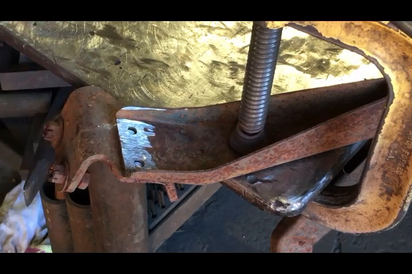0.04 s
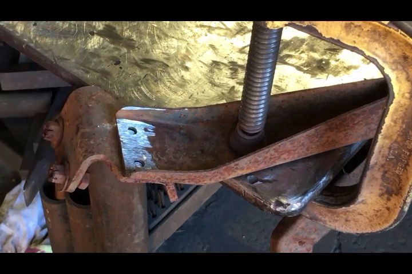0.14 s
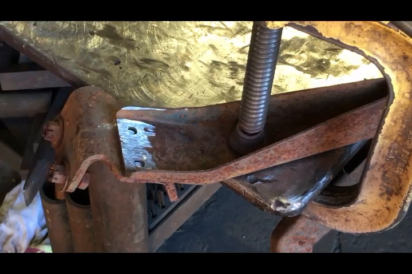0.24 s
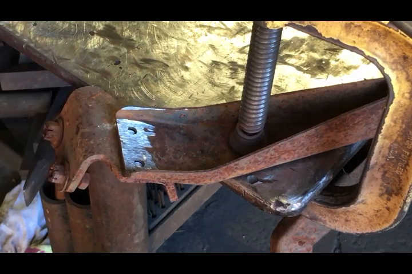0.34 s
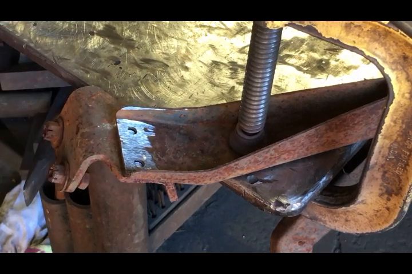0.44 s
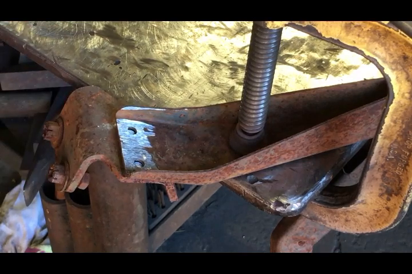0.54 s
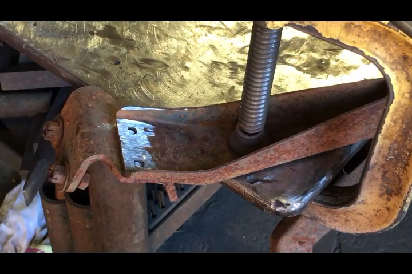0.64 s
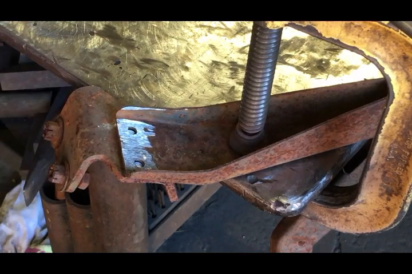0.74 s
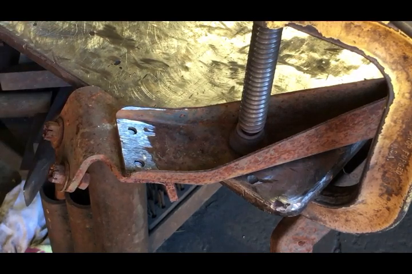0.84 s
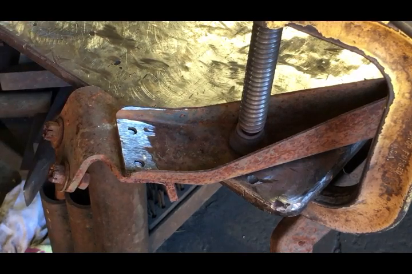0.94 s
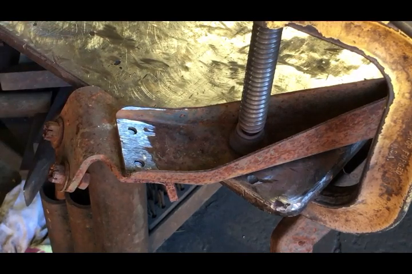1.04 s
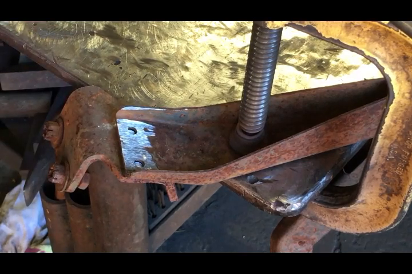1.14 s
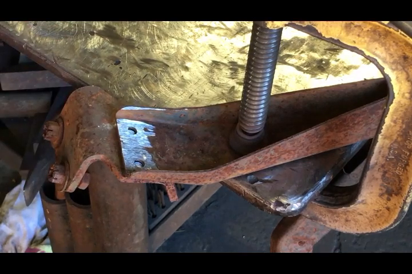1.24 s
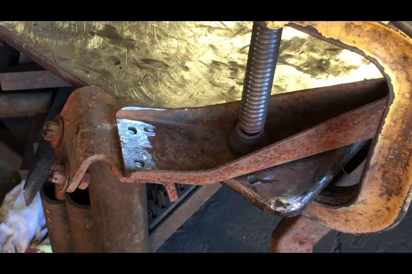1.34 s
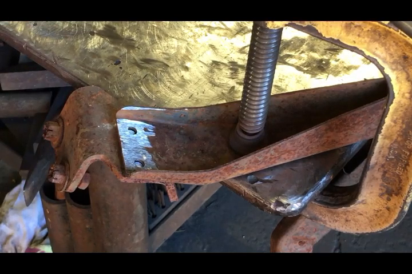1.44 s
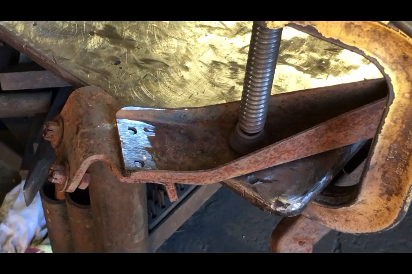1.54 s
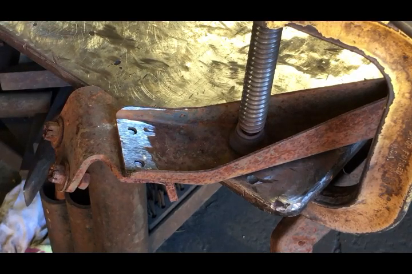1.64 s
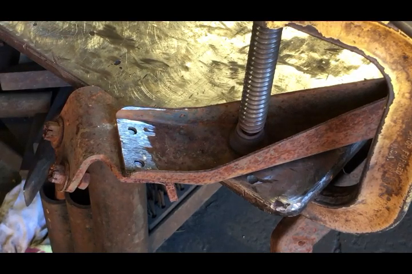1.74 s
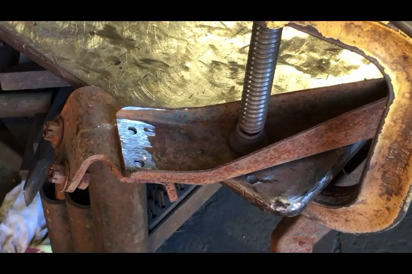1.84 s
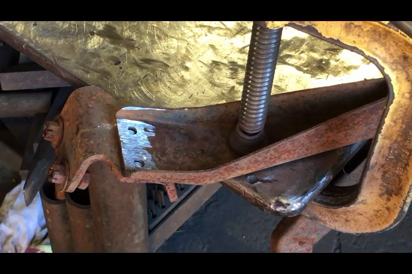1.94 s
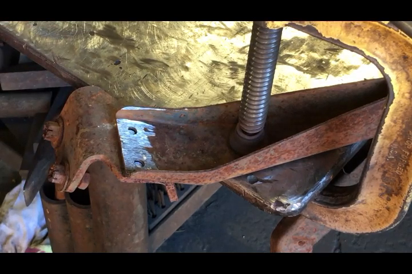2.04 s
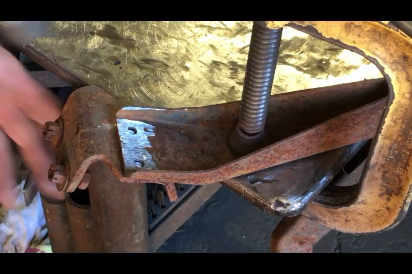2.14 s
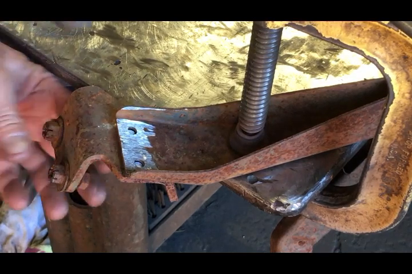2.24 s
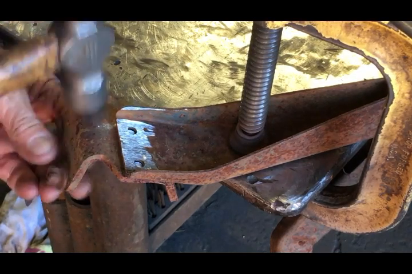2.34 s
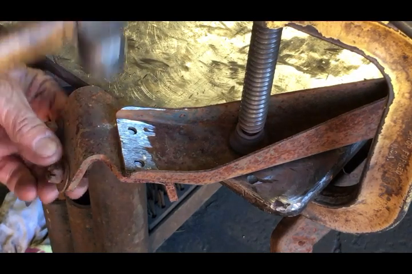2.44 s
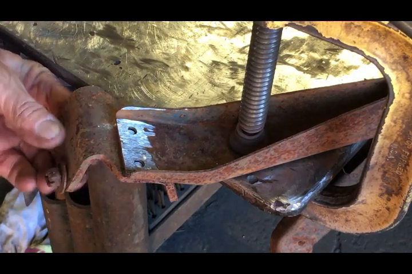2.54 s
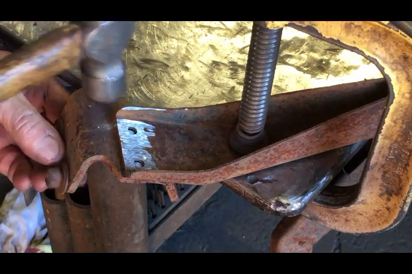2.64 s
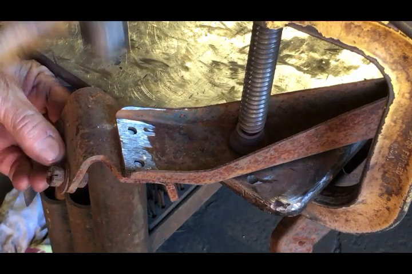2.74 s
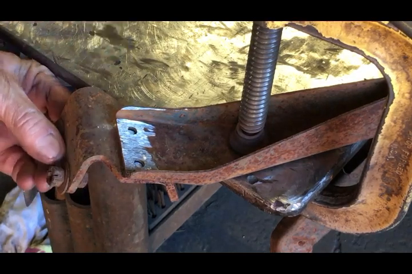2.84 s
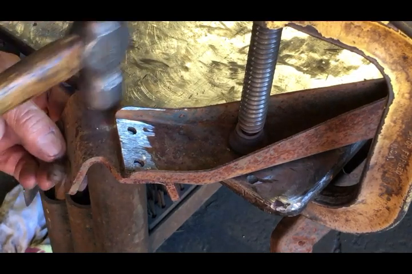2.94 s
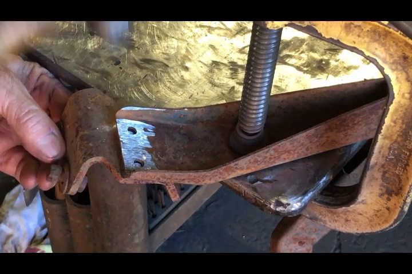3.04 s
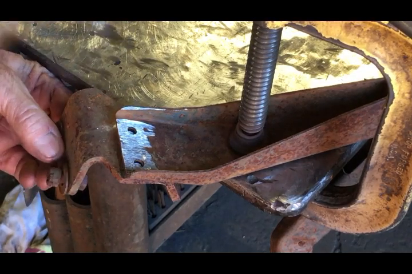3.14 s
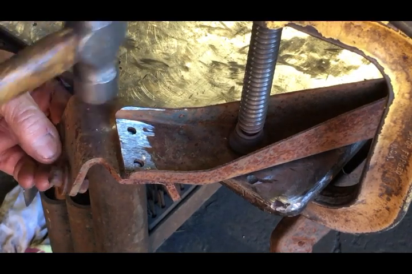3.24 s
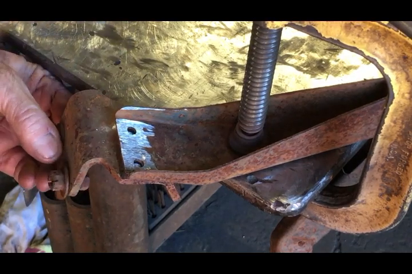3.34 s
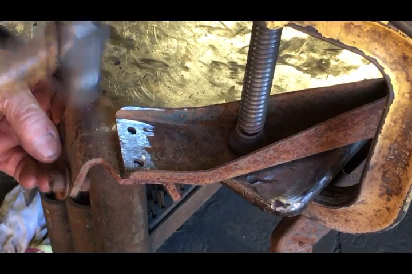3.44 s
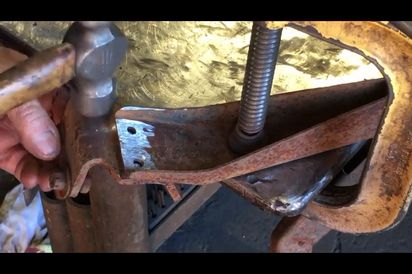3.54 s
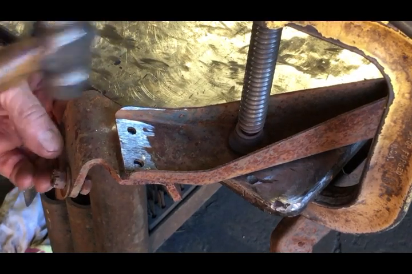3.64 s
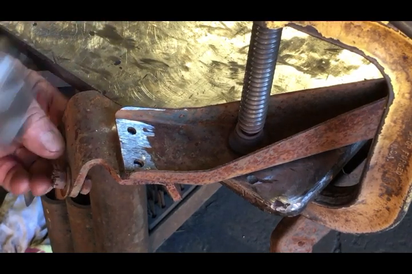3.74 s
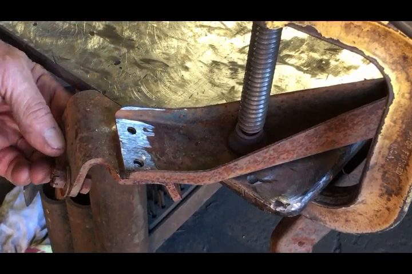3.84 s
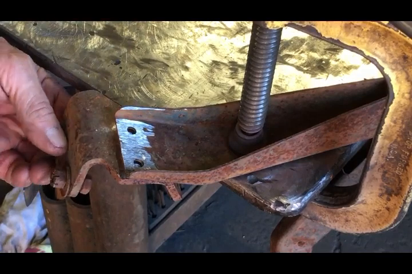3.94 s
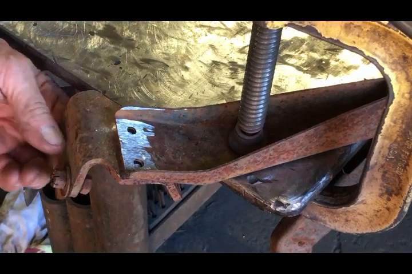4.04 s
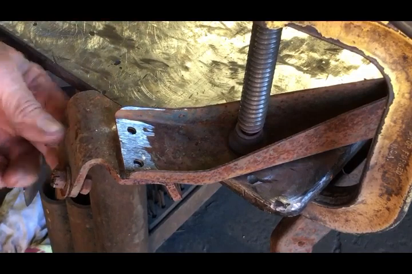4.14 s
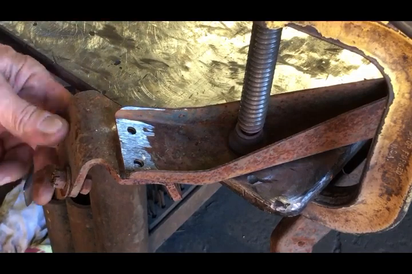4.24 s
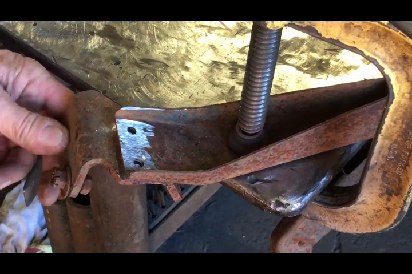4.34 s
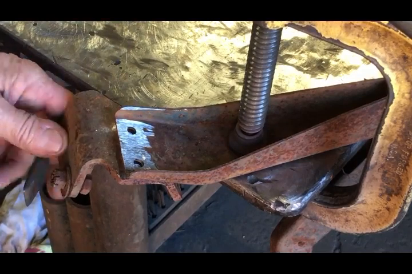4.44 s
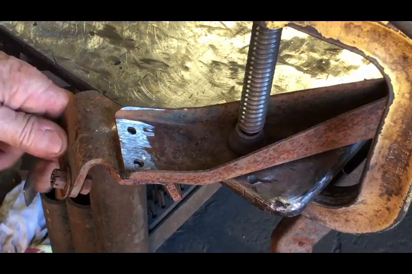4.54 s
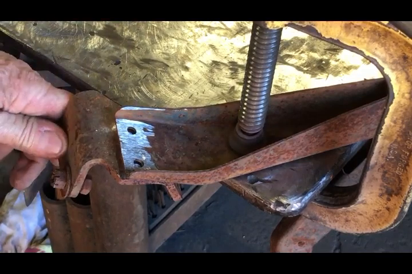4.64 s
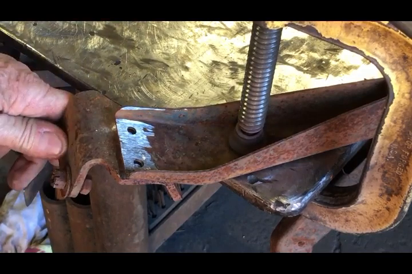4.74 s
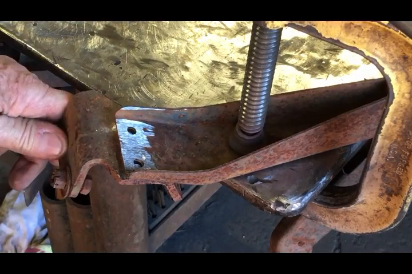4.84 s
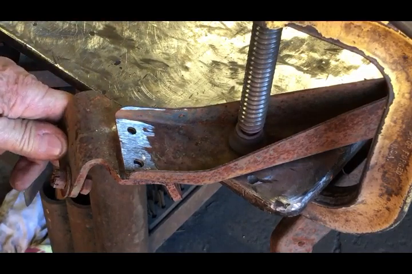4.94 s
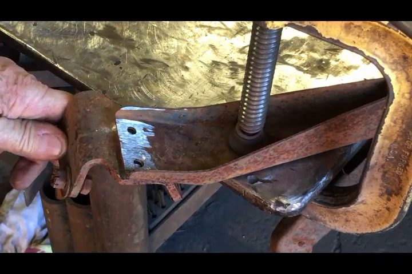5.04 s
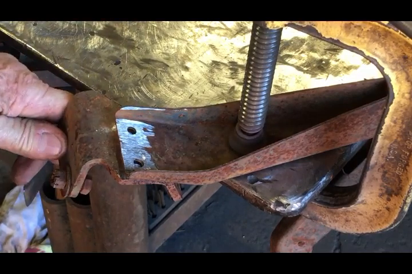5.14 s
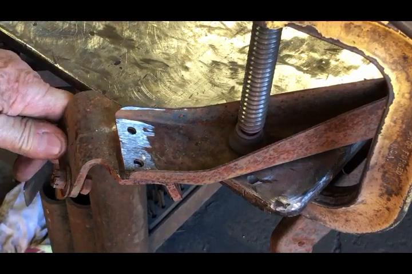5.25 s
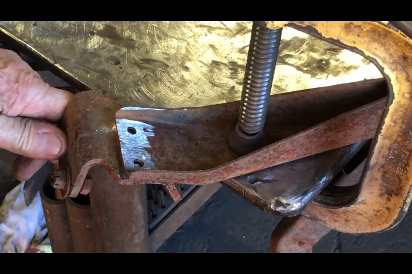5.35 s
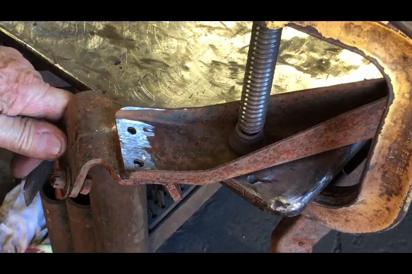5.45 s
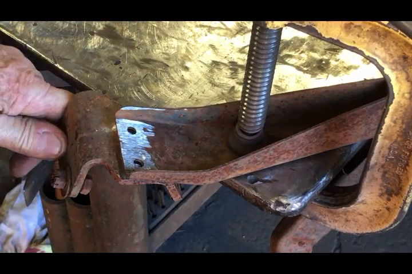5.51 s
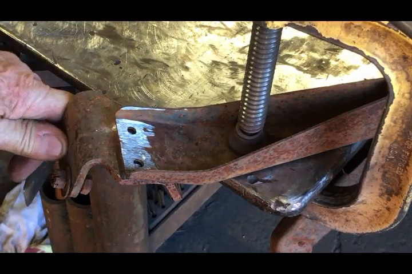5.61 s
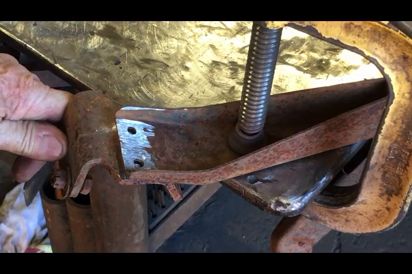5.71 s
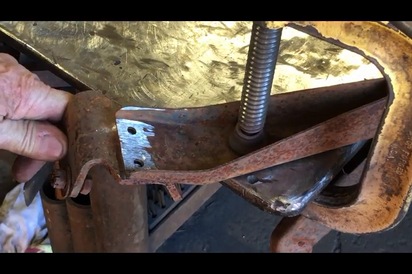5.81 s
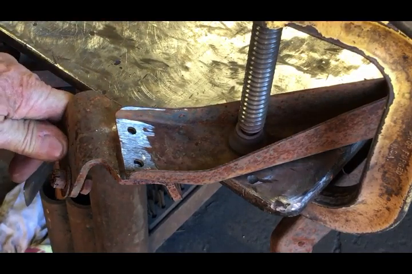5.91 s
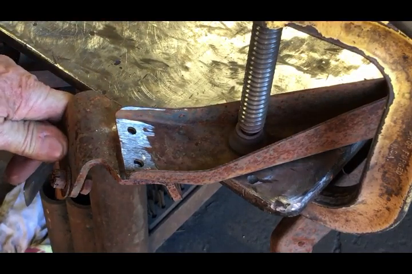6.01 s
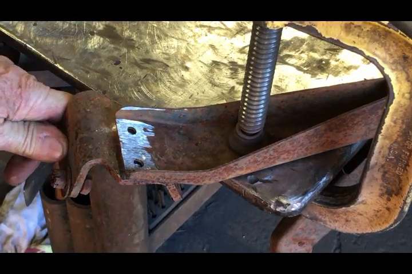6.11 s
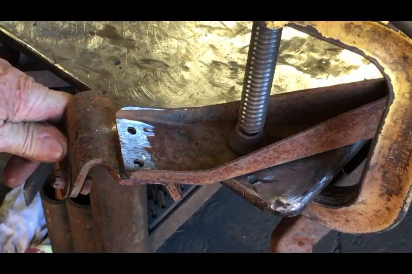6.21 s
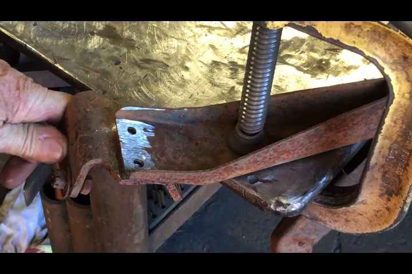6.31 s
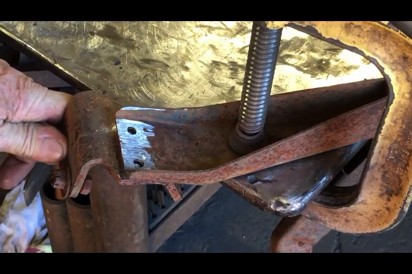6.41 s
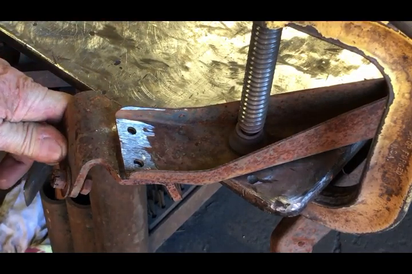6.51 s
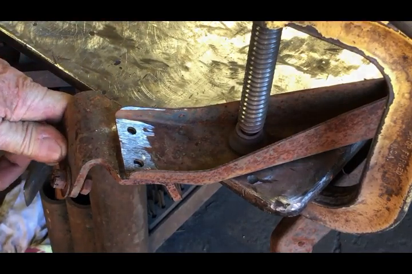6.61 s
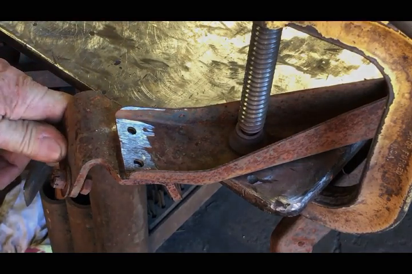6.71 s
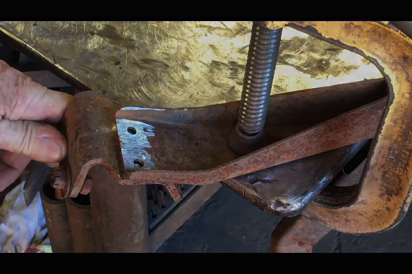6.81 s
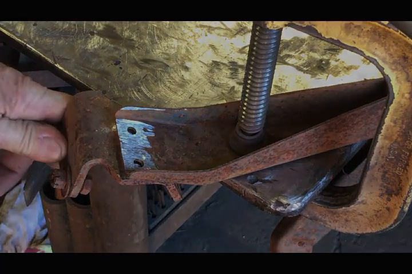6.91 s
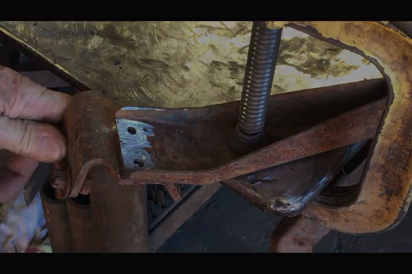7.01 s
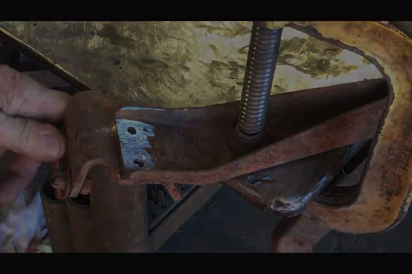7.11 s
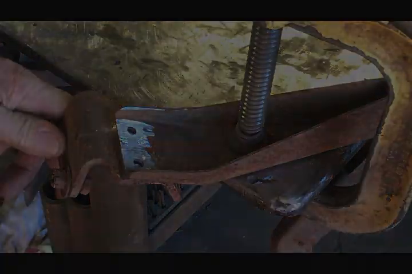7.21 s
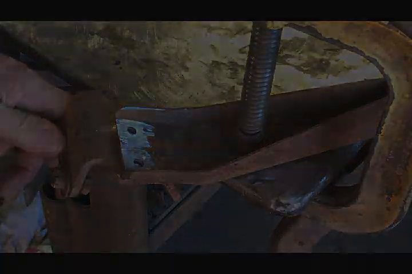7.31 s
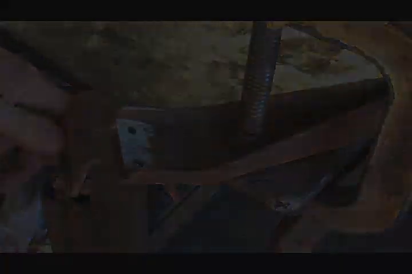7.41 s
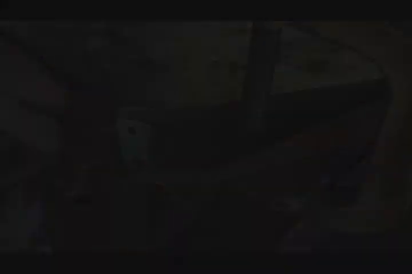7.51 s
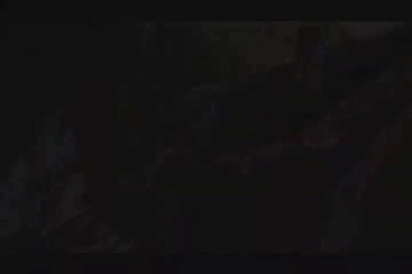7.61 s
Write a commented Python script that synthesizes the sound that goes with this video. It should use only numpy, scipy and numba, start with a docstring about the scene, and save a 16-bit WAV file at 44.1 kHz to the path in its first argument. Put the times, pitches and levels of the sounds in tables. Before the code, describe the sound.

In a workshop with a machine humming steadily, a steel chisel scrapes faintly and clinks with a bright ring as it is picked up. Five quick hammer blows follow close to the microphone, each a sharp metallic crack with a rattle, a bench thud and a short room echo. A light tap and a few faint ticks come after, then only the hum, until something softly brushes the microphone at the end.

```python
"""Five quick hammer blows, close by on a workshop bench, drive a rusty piece tighter in its clamp.
Each blow cracks, rings the steel, rattles the joints and thuds in the bench; the walls answer it.
Before them a steel chisel is picked up and clinks, ringing like a free bar. A machine hums behind,
and at the end something brushes the microphone. The recorder's gain control ducks the hum under the hits."""
import sys
import numpy as np
from scipy import signal
from scipy.fft import rfft, irfft, next_fast_len
from scipy.io import wavfile
from scipy.ndimage import uniform_filter1d, minimum_filter1d
from numba import njit

SR = 44100
rng = np.random.default_rng(int(sys.argv[2]) if len(sys.argv) > 2 else 0)


def generate_wav(signal):
    """Clip the signal to [-1, 1] and save it as 16-bit WAV at the path in sys.argv[1]."""
    frames = np.transpose(np.atleast_2d(signal))
    scaled = np.clip(frames, -1, 1) * 32767
    pcm = np.round(scaled).astype(np.int16)
    wavfile.write(sys.argv[1], SR, pcm)


N = 338247
T = np.arange(N) / SR
RING_T = T[:SR]  # one second, the length of a single event


def undb(db):
    """Decibels to gain."""
    return 10 ** (np.asarray(db) / 20)


def unit(x):
    """Scale to rms 1."""
    return x / np.sqrt(np.mean(x ** 2))


def read(points, hz):
    """Read (f/Hz, value) points on a log-frequency axis."""
    at, value = np.transpose(sorted(points))
    return np.interp(np.log(np.maximum(hz, 1)), np.log(at), value)


def add(track, s, sound):
    """Mix a sound into the track from time s on."""
    start = int(s * SR)
    track[start:start + len(sound)] += sound[:N - start]


def resonance(hz, centre_hz, width_hz):
    """Gain of a band-pass resonance."""
    return 1 / np.sqrt(1 + ((hz ** 2 - centre_hz ** 2) / (hz * width_hz)) ** 2)


def tilt(hz, slope_db, pivot_hz=7000):
    """Gain sloping by slope_db per octave: a harder contact favours the highs."""
    return undb(slope_db * np.log2(hz / pivot_hz))


def noise(shape, size=SR):
    """Noise of rms 1 whose spectrum follows the gain function shape(Hz)."""
    padded = next_fast_len(size)
    hz = np.fft.rfftfreq(padded, 1 / SR) + 1
    spectrum = rfft(rng.standard_normal(padded)) * shape(hz)
    return unit(irfft(spectrum, padded)[:size])


def band(centre_hz, width_hz, size=SR):
    """One noise band of rms 1; centred at a few hertz it serves as a random waver."""
    return noise(lambda hz: resonance(hz, centre_hz, width_hz) ** 2, size)


def bands(rows, size=SR):
    """A sum of noise bands from rows of (f/Hz, level/dB, width/Hz)."""
    return sum(undb(db) * band(hz, width_hz, size) for hz, db, width_hz in rows)


def grit(centre_hz):
    """A second of broad noise around a centre."""
    return noise(lambda hz: resonance(hz, centre_hz, centre_hz))


def fade(t60):
    """Exponential decay that loses 60 dB in t60 seconds; 1 - fade is an onset."""
    return np.exp(-np.log(1000) * RING_T / t60)


def fade_by_band(x, t60s, swell_cycles):
    """Each frequency region of x swells over some cycles, so lows come late, and dies at its own rate."""
    hz, spectrum = np.fft.rfftfreq(SR, 1 / SR), rfft(x)
    centres = [row[0] for row in t60s]
    out = np.zeros(SR)
    for share, (centre_hz, t60) in zip(np.eye(len(t60s)), t60s):
        region = irfft(spectrum * read(zip(centres, share), hz), SR)
        swell = 1 - np.exp(-RING_T * centre_hz / swell_cycles)
        out += region * fade(t60) * swell
    return out


def machine(air_db=-33, air_waver_db=0.5, tone_waver_db=2, drift_rad=0.23):
    """The machine in the background: motor tones and a droning housing over a wavering rush of air."""
    # motor tones: f/Hz, level/dB
    motor = [(80.5, -49.5), (149.5, -51), (469, -45.5)]
    # drone of the housing and faint whines: f/Hz, level/dB, width/Hz
    housing = [(81.8, -46.5, 13), (149, -44.5, 11), (175.5, -43, 11), (302.2, -45.5, 24), (475, -55.5, 17),
               (10800, -79.5, 200), (14240, -83, 300)]
    # spectrum of the rushing air: f/Hz, relative density/dB
    air_spectrum = [(15, -59), (25, -25.5), (48, -15), (70, 0), (161, -1), (200, -10), (229, -5.5),
                    (256, -11), (301, -6), (427, -15.5), (476, -11), (591, -19.5), (1070, -23), (1480, -31),
                    (16000, -58)]

    def waver():
        """Slow chance, a few turns a second."""
        return band(5.34, 6.9, N)
    tones = np.zeros(N)
    for hz, db in motor:
        level = undb(db + tone_waver_db * waver())
        tones += level * unit(np.sin(2 * np.pi * hz * T + drift_rad * waver()))
    air = undb(air_db + air_waver_db * waver()) * noise(lambda hz: undb(read(air_spectrum, hz)), N)
    return tones + bands(housing, N) + air


def workshop(x, near_db, room_db):
    """The microphone gets the direct sound, quick reflections off the bench, then the walls' diffuse tail."""
    # reverberation of the room: f/Hz, t60/s
    room_t60 = [(200, 0.88), (1000, 1), (2500, 1), (5500, 0.97), (9000, 0.53), (14000, 0.36)]
    colour = [(200, -3), (1000, -3), (5000, -5), (9000, -6), (15000, 0.5)]  # of the tail: f/Hz, level/dB
    near = rng.standard_normal(SR) * fade(0.017) * (RING_T > 0.003)
    tail = fade_by_band(noise(lambda hz: undb(read(colour, hz))), room_t60, swell_cycles=13)
    response = undb(near_db) * unit(near) + undb(room_db) * unit(tail)
    return x + signal.fftconvolve(x, response / np.sqrt(SR))[:N]


def microphone_brush(s=7.586, rise_s=0.02, rustle_db=-42.5):
    """Something brushes the microphone: a rustle over a low bump."""
    # the bump: f/Hz, level/dB, width/Hz
    bump = [(62, -29.5, 62)]
    out = np.zeros(N)
    brush = undb(rustle_db) * grit(centre_hz=2270) + bands(bump)
    add(out, s, brush * fade(0.98) * np.minimum(RING_T / rise_s, 1))
    return out


def handling(scrape_db=-7):
    """Fingers and tool shift on the steel with light ticks and scuffs."""
    # small ticks: t/s, level/dB
    ticks = [(1.155, -41.5), (4.297, -47), (4.3938, -53), (4.4606, -51), (4.7655, -46.5)]
    # steel slides on steel: t/s, length/s, level/dB, centre f/Hz
    scuffs = [(1.049, 0.17, -59, 5500), (1.448, 0.21, -55.5, 3740), (3.94, .04, -44.5, 2990)]
    # resonances that the sliding excites: f/Hz, level/dB, width/Hz
    scrape = [(2020, -3.5, 260), (4370, -2, 120), (5340, -10.5, 120), (6520, -8, 160)]
    out = np.zeros(N)
    for s, db in ticks:
        add(out, s, undb(db) * grit(centre_hz=5330) * fade(0.033) * (1 - fade(0.003)))
    for s, length_s, db, centre_hz in scuffs:
        stroke = np.sin(np.pi * np.minimum(RING_T / length_s, 1))
        add(out, s, undb(db) * stroke * (grit(centre_hz) + undb(scrape_db) * bands(scrape)))
    return out


def clank(slope_db):
    """Countless heavily damped modes of rusty steel and bench."""
    # spectrum of the dense ringing: f/Hz, relative density/dB
    spectrum = [(88, -41.5), (150, 1), (291, -11.5), (484, -3), (662, -7.5), (1060, 5.5), (1480, -5.5),
                (2220, -11.5), (2500, -8.5), (3700, -12.5), (4320, -13), (6510, -19.5), (9440, -13),
                (13400, -23), (16000, -32.5)]
    # its ring times: f/Hz, t60/s
    t60s = [(300, 0.26), (1000, 0.093), (3000, 0.2), (8000, 0.11), (15000, 0.076)]
    dense = noise(lambda hz: undb(read(spectrum, hz)) * tilt(hz, slope_db))
    return fade_by_band(dense, t60s, swell_cycles=5.1)


def bar_swing(ratio, spot):
    """Swing at a spot along a free bar of the mode at ratio times its lowest pitch; none at the nodes."""
    half_waves = np.floor(1.5 * np.sqrt(ratio)) + 0.5
    return abs(np.cos(np.pi * (half_waves * spot + 1 / 4)))


def chisel(ring_db=-3.5, kept=0.2, grip_s=1.875, grip_t60=0.48, flutter_db=1.5, wobble_rad=0.41):
    """The free bar's ring and the clacks beneath it; each contact checks and renews the vibration."""
    # the loose chisel lands on steel: t/s, level/dB, spot along the bar/0-1, clack level/dB
    clinks = [(1.6826, -20, .42, -24), (1.6917, -4.5, .42, -6.5), (1.7800, -14, .42, -26),
              (1.7917, -5.5, .485, -14.5), (1.8475, -12, .41, -21), (1.8745, -10, .32, -27),
              (1.8840, -9.5, .29, -28)]
    # bending modes across the flat side: f/Hz, level/dB, t60/s
    flatwise = [(2616, -9, 1.3), (2672, -22, .4), (7077, 0, .7), (11824, -3, .6)]
    # bending modes across the edge: f/Hz, level/dB, t60/s
    edgewise = [(6637, 0, .8), (12200, -23, .3), (13394, 0, .45)]
    balance_s, roll_db_per_s = 1.77, 18  # rolling from edge to flat shifts the ring between the planes
    gripped_s = np.maximum(T - grip_s, 0)
    bar, clacks = np.zeros(N), np.zeros(N)
    for modes, side in ((flatwise, 1), (edgewise, -1)):
        for hz, mode_db, t60 in modes:
            # contacts and the closing hand damp the high modes most
            ratio = hz / flatwise[0][0]
            survives = kept ** ratio
            grip = np.exp(-np.log(1000) * gripped_s * ratio ** 0.3 / grip_t60)
            swing, envelope = np.zeros(N), fade(t60) * (1 - fade(0.0025))
            for s, db, spot, _ in clinks:
                roll_db = side * roll_db_per_s * (s - balance_s)
                swing[int(s * SR):] *= survives
                add(swing, s, undb(db + mode_db + roll_db) * bar_swing(ratio, spot) * envelope)
            # the loose bar shifts on its support
            flutter = undb(flutter_db * band(16, 16, N))
            wobble = wobble_rad * band(16, 16, N)
            bar += swing * grip * flutter * np.sin(2 * np.pi * hz * T + wobble)
    for s, _, _, clack_db in clinks:
        add(clacks, s, undb(clack_db) * clank(slope_db=3))
    return undb(ring_db) * bar, clacks


def steel_ring(slope_db, scatter_db=3.5, detune=0.0036, damping=3.3):
    """Decaying modes of the clamped steel; their shares vary by chance, as with the spot that is struck."""
    # modes of the steel: f/Hz, level/dB, t60/s before damping
    modes = [(549, -13, 0.56), (888, -4, 0.26), (1066, -7, 0.4), (1680, -8, 0.2), (1954, 0, 0.16),
             (2250, -7, 0.26), (2702, -13, 0.45), (3435, -9, 0.24), (3887, -7, 0.2), (3967, -12, 0.32),
             (4151, -7, 0.28), (4226, -5, 0.25), (4441, -10, 0.32), (4640, -5, 0.18), (5006, -12, 0.24),
             (5502, -8, 0.2), (5652, -11, 0.27), (7590, -11, 0.3), (7784, -2, 0.16), (8236, -11, 0.22),
             (8969, -11, 0.19), (9539, -15, 0.26), (9776, -9, 0.21), (10810, -21, 0.38), (11820, -13, 0.18),
             (13160, -14, 0.22), (13450, -18, 0.25), (13710, -20, 0.23)]
    out = np.zeros(SR)
    for hz, db, t60 in modes:
        loudness, mistuning, phase = rng.standard_normal(3)
        level = undb(db + scatter_db * loudness) * tilt(hz, slope_db)
        cycles = hz * (1 + detune * mistuning) * RING_T + phase
        out += level * fade(t60 / damping) * np.sin(2 * np.pi * cycles)
    nominal_rms = np.sqrt(sum(undb(db) ** 2 for _, db, _ in modes) / 2)
    return out / nominal_rms


def strike(db, slope_db, seat_hz, thud_db, seat_db=0.5, seat_t60=0.094,
           crack_db=1, crack_t60=0.018, ring_db=-4.5, clank_db=5, rattle=0.26):
    """One contact cracks, rings steel and clamp, rocks the piece against its seat and jolts the bench."""
    # clusters of close modes in clamp and bench: f/Hz, level/dB, width/Hz
    clusters = [(1118, -7.5, 120), (2085, -6, 490), (2263, -8.5, 130), (4290, -14, 242), (5500, -9, 770),
                (7910, -9.5, 170), (9270, -11, 120), (11700, -33.5, 130)]
    # low resonances of the bench: f/Hz, level/dB, width/Hz
    bench = [(76, -2, 85.5), (182, 1.5, 69), (413, -1, 80), (511, 2.5, 70)]
    crack = noise(lambda hz: resonance(hz, 7500, 9300) ** 2 * tilt(hz, slope_db)) * fade(crack_t60)
    ring = steel_ring(slope_db)
    # clamp, seat and bench take a few milliseconds to start moving
    clamp = bands(clusters) * fade(0.16) * (1 - fade(0.0082))
    seat = band(seat_hz, width_hz=204) * fade(seat_t60) * (1 - fade(0.041))
    thud = bands(bench) * fade(0.22) * (1 - fade(0.045)) ** 2
    # light taps are clean, hard blows rattle the rusty joints: their share grows by `rattle` dB per dB
    joints = undb(rattle * db) * (undb(clank_db) * clank(slope_db) + clamp)
    steel = undb(crack_db) * crack + undb(ring_db) * ring + joints
    return undb(db) * (steel + undb(seat_db) * seat + undb(thud_db) * thud)


def touches():
    """The tool meets the work lightly before and after the run of blows."""
    # setting on and lifting off: t/s, level/dB, brightness/dB per octave, contact resonance f/Hz
    contacts = [(2.333, -24, 0, 4460), (2.357, -27.5, -1.5, 2700), (3.6922, -24, 3, 8450)]
    out = np.zeros(N)
    for s, db, slope_db, contact_hz in contacts:
        add(out, s, strike(db, slope_db, contact_hz, thud_db=-31, seat_db=-2, seat_t60=0.073,
                           crack_db=-1, clank_db=6, rattle=0.4))
    return out


def hammer(slack_left=0.62):
    """Blows and rebounds; as the piece tightens it rings higher, sounds duller and jolts the bench less."""
    # blow t/s, level/dB, rebound t/s (the third just ahead of its blow), rebound level/dB re the blow
    blows = [(2.385, -7, 2.3922, -5), (2.6533, -3, 2.6610, -13), (2.9339, -4, 2.93, -9),
             (3.2191, -1, 3.2632, -14), (3.4904, -3, 3.5295, -7)]
    out, slack = np.zeros(N), 1
    for s, db, rebound_s, rebound_db in blows:
        seat_hz = 1095 - 195 * slack
        slope_db = 1 + slack
        thud_db = -18 + 7.5 * slack
        add(out, s, strike(db, slope_db, seat_hz, thud_db))
        # a rebound lands softly, mostly bare steel on steel
        add(out, rebound_s, strike(db + rebound_db, slope_db - 0.7, seat_hz, thud_db - 16,
                                   crack_db=4.5, crack_t60=0.015, rattle=0.37))
        slack *= slack_left
    return out


def scene():
    """One microphone near the bench in the humming workshop; the chisel's ring carries the least room."""
    bar, clacks = chisel()
    bench_work = hammer() + touches() + clacks + handling() + microphone_brush()
    work = workshop(bench_work, near_db=-10.5, room_db=-14.5)
    ringing = workshop(bar, near_db=-19, room_db=-22.5)
    return (work + ringing + machine())[None]


@njit
def recover(cut, step):
    """A gain cut acts at once and lets go slowly."""
    out, now = np.empty(len(cut)), 0.
    for i in range(len(cut)):
        now = min(cut[i], now + (cut[i] - now) * step)
        out[i] = now
    return out


def gain_control(x, top_db, depth_db, hold_s, release_s):
    """Turn down peaks over top_db by up to depth_db, hold, then recover; looks a millisecond ahead."""
    hold, ahead = int(hold_s * SR), SR // 1000
    cut_db = np.clip(top_db - 20 * np.log10(np.abs(x) + 1e-9), -depth_db, 0)
    held_db = minimum_filter1d(cut_db, hold, origin=(hold - 1) // 2)
    released_db = recover(held_db, 1 / (release_s * SR))
    smooth_db = uniform_filter1d(minimum_filter1d(released_db, 2 * ahead), ahead)
    return x * undb(smooth_db)


def record(dry):
    """The recorder: a slow gain control ducks the room, a fast limiter flattens the blows, the top is cut."""
    ducked = gain_control(dry[0], top_db=3.5, depth_db=9.5, hold_s=0.3, release_s=0.11)
    limited = gain_control(ducked, top_db=-0.3, depth_db=40, hold_s=0.009, release_s=0.02)
    low_pass = signal.ellip(10, 0.2, 80, 15600, fs=SR, output="sos")
    return signal.sosfilt(low_pass, limited)[None]


dry = scene()
out = record(dry)
generate_wav(out)
```